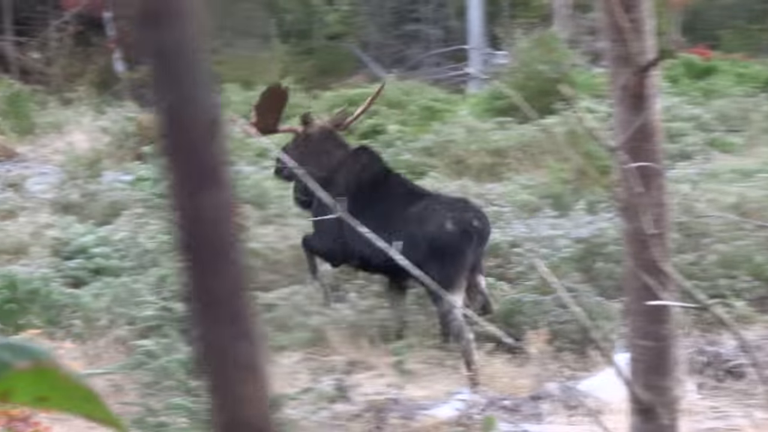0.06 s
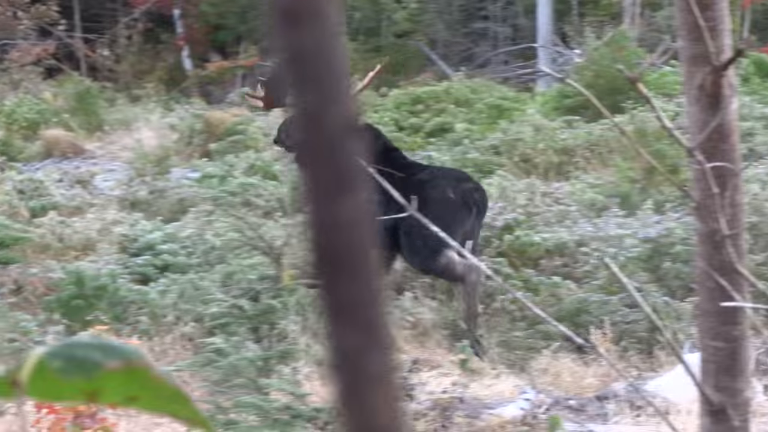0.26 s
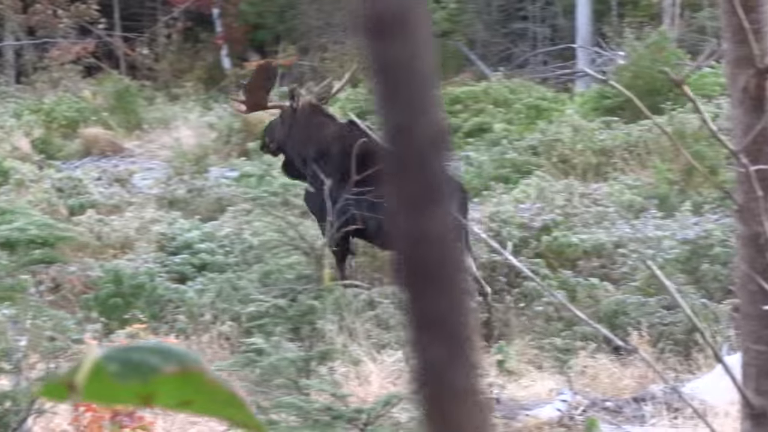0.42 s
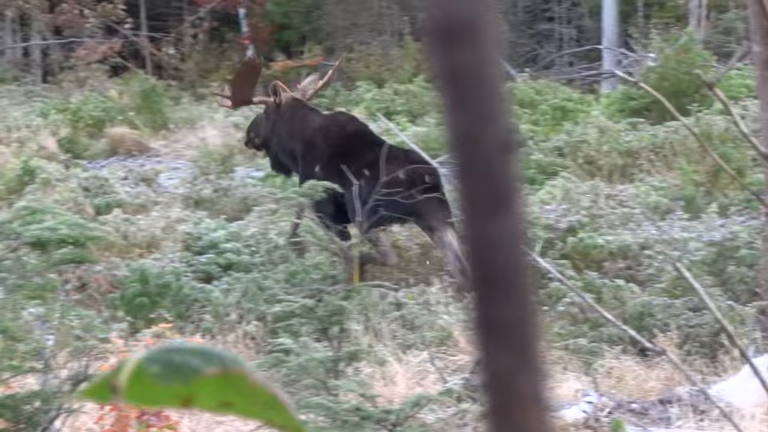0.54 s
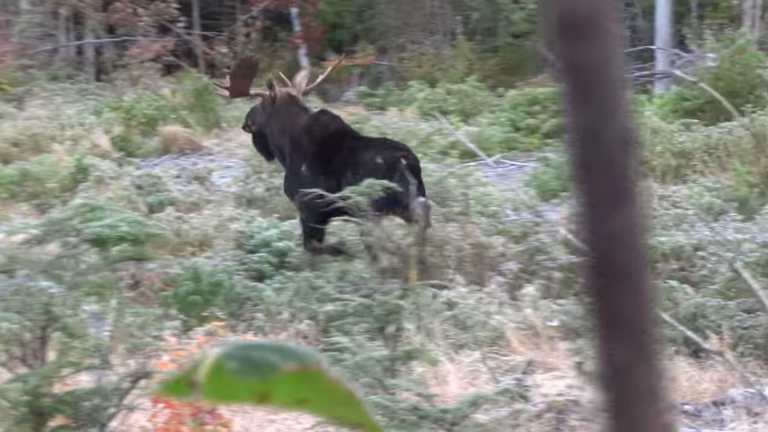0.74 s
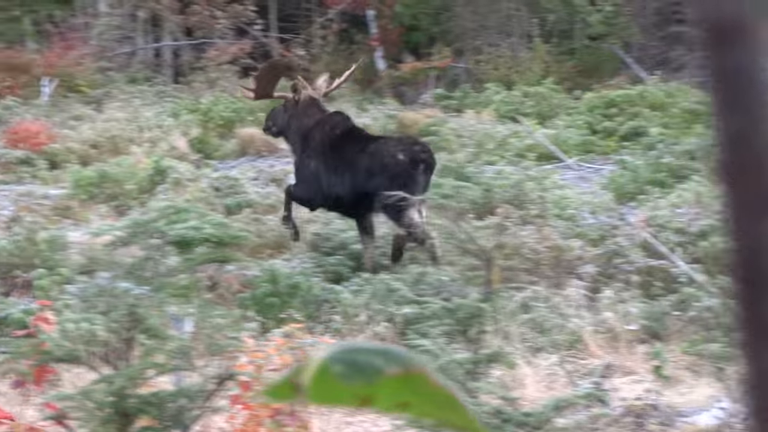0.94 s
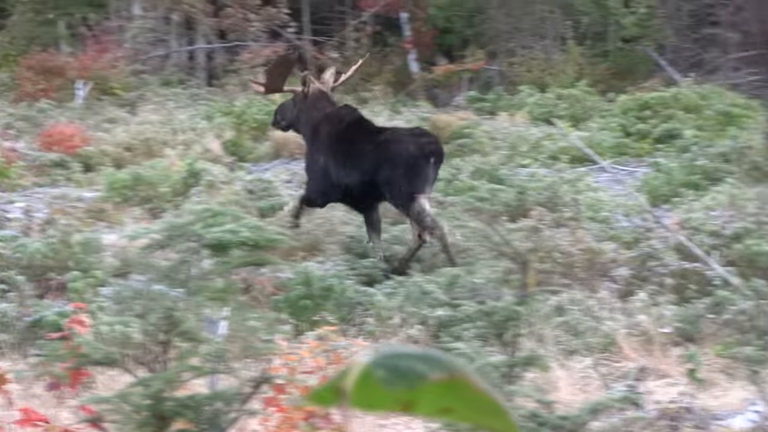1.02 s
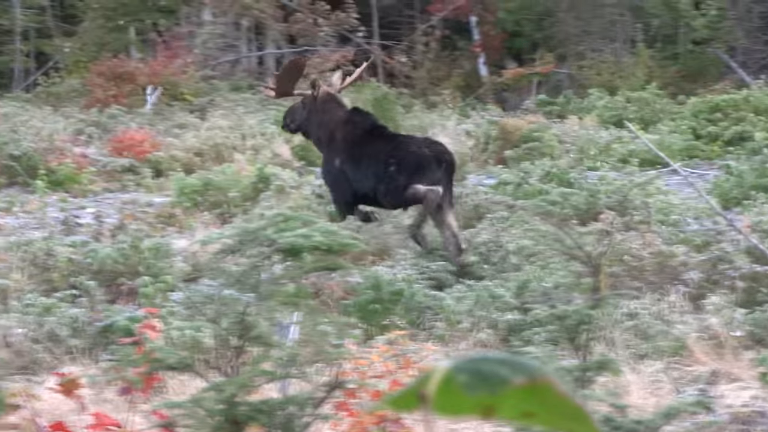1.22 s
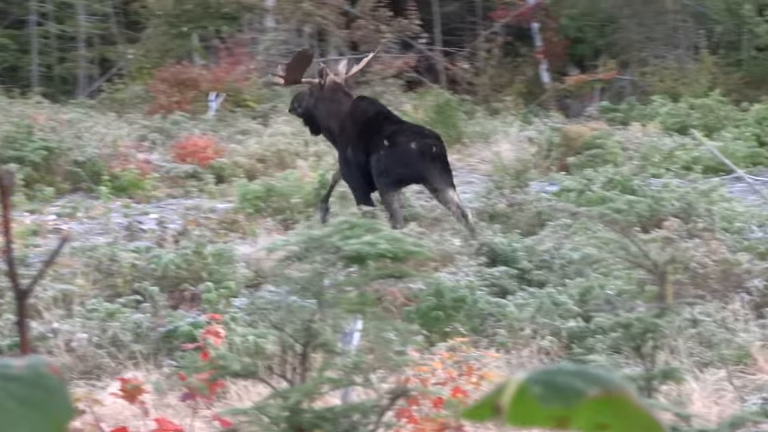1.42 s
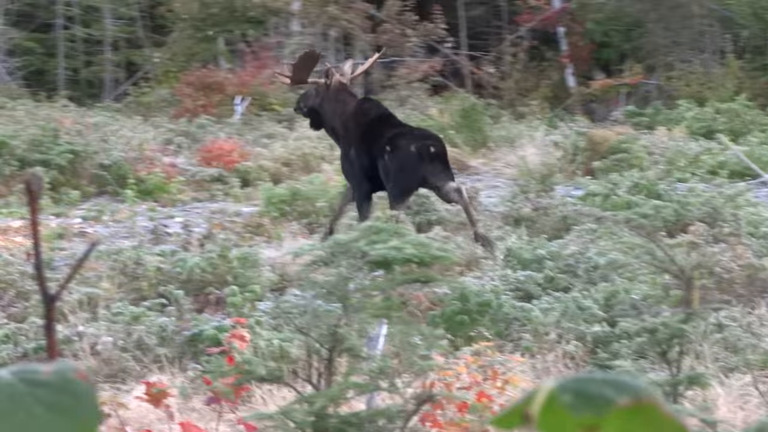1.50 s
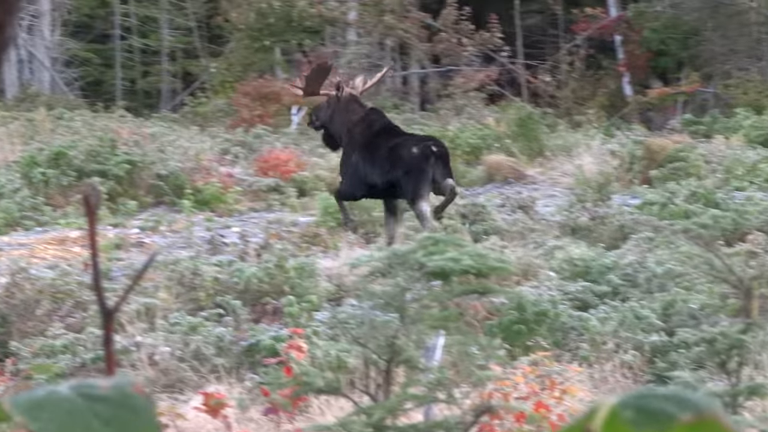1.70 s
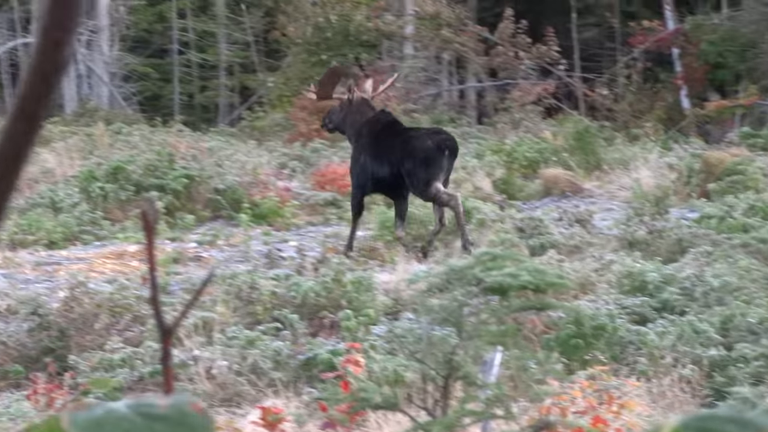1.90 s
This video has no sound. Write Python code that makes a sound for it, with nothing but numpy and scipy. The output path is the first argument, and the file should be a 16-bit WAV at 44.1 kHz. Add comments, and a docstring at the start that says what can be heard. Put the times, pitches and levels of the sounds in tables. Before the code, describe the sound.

Close, crackling rustle of leaves and stems, with sharp twig snaps under a trotting moose.

```python
"""A close, dry rustle swells unevenly in a forest clearing while a moose trots through it.
Leaves hiss and stems crackle: countless tiny contacts over a smooth rubbing noise.
Twigs crack and ring as their fibres tear, two of them sharply, and thicker sticks knock.
Underneath lie faint low thumps and light wind on the foliage and the microphone.
The trees return a short echo of the breaking wood."""
import sys
import numpy as np
from scipy import signal
from scipy.fft import rfft, irfft, next_fast_len
from scipy.io import wavfile
from scipy.ndimage import map_coordinates

SR = 44100
rng = np.random.default_rng(int(sys.argv[2]) if len(sys.argv) > 2 else 0)


def int16_out(signal):
    """Quantize to a 16-bit WAV file."""
    q = np.round(np.clip(np.atleast_2d(signal).T, -1, 1) * 32767)
    wavfile.write(sys.argv[1], SR, q.astype(np.int16))


N = 85995


def amp(db):
    """Decibels to gain."""
    return 10 ** (np.asarray(db) / 20)


def unit(x):
    """Scale to an rms of 1."""
    return x / np.sqrt(np.mean(x ** 2) + 1e-20)


def curve_at(points, hz):
    """Read (frequency, value) breakpoints on a log frequency axis."""
    freqs, values = np.transpose(points)
    return np.interp(np.log(hz + 1), np.log(freqs + 1), values)


def wobble(per_s):
    """A smooth random modulator with per_s knots a second."""
    knots = rng.standard_normal(int(N * per_s / SR) + 4)
    return map_coordinates(knots, [np.arange(N) * per_s / SR])


def filtered(x, response):
    """Apply a gain given as a function of frequency."""
    size = next_fast_len(x.shape[-1] + 8192)
    hz = np.fft.rfftfreq(size, 1 / SR)
    return irfft(rfft(x, size) * response(hz), size)[..., :x.shape[-1]]


def coloured(x, spectrum):
    """Apply an EQ curve, normalised to unit power."""
    return filtered(x, lambda hz: unit(amp(curve_at(spectrum, hz))))


def wood_low_cut(x, cut_hz=890):
    """Roll off the lows: thin wood radiates no bass."""
    return signal.sosfilt(signal.butter(2, cut_hz, "high", fs=SR, output="sos"), x)


def add(track, start_s, sound):
    """Mix a sound into the track at start_s."""
    part = track[..., max(0, round(start_s * SR)):][..., :sound.shape[-1]]
    part += sound[..., :part.shape[-1]]


# Stereo image, 1 being mono (frequency [Hz], left-right correlation [0-1])
STEREO_IMAGE = [(60, 0.9), (250, 0.9), (500, 0.76), (1000, 0.71), (2000, 0.83), (4000, 0.93), (8000, 0.99),
                (11000, 0.8)]

def stereo(pair):
    """Blend two unrelated signals as mid and side, with a width that depends on frequency."""
    def mid_side_gains(hz):
        angle = np.arccos(np.clip(curve_at(STEREO_IMAGE, hz), -1, 1)) / 2
        return np.array([np.cos(angle), np.sin(angle)])
    mid, side = filtered(pair, mid_side_gains)
    return np.array([mid + side, mid - side])


# Tone of the wind bed (frequency [Hz], level [dB])
WIND_EQ = [(20, -41), (35, -27), (60, -12.5), (90, -17.5), (180, -18), (300, -11.5), (500, -4.5),
           (750, -2.5), (1020, 3.5), (1400, -9.5), (2000, -7), (4000, -12), (11000, -24)]

def wind(level_db, gust_db):
    """Light air on foliage and microphone: a faint, barely wavering rush."""
    rush = unit(coloured(rng.standard_normal((2, N)), WIND_EQ))
    return amp(level_db + gust_db * wobble(per_s=6.3)) * stereo(rush)


# Reverb decay among the trees (frequency [Hz], t60 [s])
FOREST_DECAY = [(300, 0.24), (2000, 0.49), (10000, 0.13)]

def forest_echo(x):
    """Trees scatter sound into a short, diffuse tail; the treble dies first."""
    hz, t, noise = signal.stft(rng.standard_normal((2, SR // 2)), SR, nperseg=256)
    decay = amp(-60 * t / curve_at(FOREST_DECAY, hz)[:, None])
    _, tail = signal.istft(noise * decay, SR, nperseg=256)
    tail /= np.linalg.norm(tail[0])
    return stereo(signal.fftconvolve(x.mean(0)[None], tail, axes=1)[:, :N])


# Low thump cues (time [s], level [dB], pitch [Hz])
THUMP_CUES = [(.305, -75, 135), (.38, -80, 55), (.837, -72, 101), (1.225, -83, 50.4)]

def thumps(attack_s=0.008, t60=0.11):
    """Faint low bumps, each a damped sine with a soft attack."""
    out, t = np.zeros(N), np.arange(SR // 4) / SR
    envelope = (1 - np.exp(-t / attack_s)) * amp(-60 * t / t60)
    for start_s, db, hz in THUMP_CUES:
        add(out, start_s, amp(db) * envelope * np.sin(2 * np.pi * hz * t))
    return out


# Thick sticks giving way (time [s], level [dB], pitch [Hz])
KNOCK_CUES = [(0.376, -33, 2630), (0.4239, -39.5, 2200), (0.557, -47, 2070), (0.6148, -36.5, 2100),
              (.6755, -42, 2300), (0.751, -33.5, 1820), (0.766, -38.5, 1960), (1.195, -31.5, 2210),
              (1.2352, -27.5, 1380), (1.253, -33, 2340), (1.255, -36, 1110), (1.669, -42.5, 726)]
# Ringing modes of a stick (frequency / pitch [ratio], level [dB], t60 [s])
STICK_MODES = [(.76, -1.5, 0.0032), (1, 0.5, 0.0074), (1.3, -1, 0.0056), (1.7, -5.5, .004)]

def stick_knocks(scatter_db=-11, scatter_t60=0.033):
    """Thick sticks give a short, hollow ring that scatters in the brush."""
    out, t = np.zeros(N), np.arange(SR // 12) / SR
    scatter_envelope = amp(scatter_db - 60 * t / scatter_t60)
    for start_s, db, hz in KNOCK_CUES:
        ring = sum((-1) ** k * amp(mode_db - 60 * t / t60) * np.sin(2 * np.pi * hz * ratio * t)
                   for k, (ratio, mode_db, t60) in enumerate(STICK_MODES))
        scatter = unit(signal.fftconvolve(rng.standard_normal(len(t)), ring)[:len(t)])
        add(out, start_s, amp(db) * (ring + scatter_envelope * scatter))
    return wood_low_cut(out)


# Woody resonances of a twig (frequency [Hz], bandwidth [Hz], level [dB])
TWIG_MODES = [(1080, 53, -12.5), (2100, 260, 1), (3180, 350, 7), (4370, 300, 10.5), (5440, 320, 7.5)]

def twig_body(hz):
    """A twig's normalised frequency response: resonances of alternating polarity."""
    response = sum((-1) ** k * amp(db) * 1j * hz * width / (centre ** 2 - hz ** 2 + 1j * hz * width)
                   for k, (centre, width, db) in enumerate(TWIG_MODES))
    return response / np.std(response)


# Twigs breaking (time [s], level [dB], crack t60 [s], woody ring relative to crack [dB])
SNAP_CUES = [(0.0214, -39, 0.019, -5), (0.1058, -40.5, .012, -5), (.1970, -30, 0.0097, -16),
             (0.3922, -19.5, 0.015, -2.5), (0.4559, -17, 0.014, -1.5), (0.463, -26.5, .025, -12),
             (0.6134, -36.5, 0.028, -17), (0.7276, -34.5, 0.062, 1), (0.856, -40, 0.045, -24),
             (.900, -43, 0.069, -18), (1.0565, -34, 0.013, -11), (1.1999, -42, 0.017, 8),
             (1.2238, -33, 0.006, -2.5), (1.265, -37.5, 0.021, 2.5), (1.3774, -35.5, 0.032, -18)]
# Bright tone of tearing fibres (frequency [Hz], level [dB])
TEAR_EQ = [(1000, -49), (2500, -20.5), (4000, -18), (5400, -9.5), (6600, 3.5), (7600, -0.5), (9200, -3),
           (10200, -11.5), (11000, -16)]

def twig_snaps(attack_s=0.00055, tail_db=-14, tail_t60=0.15, click_db=14.5, splinter_db=-3.5):
    """The break rings the twig while its fibres tear; nearby brush scatters a tail."""
    out, t = np.zeros((2, N)), np.arange(SR // 5) / SR
    attack = 1 - np.exp(-t / attack_s)
    tail = amp(tail_db - 60 * t / tail_t60)
    for start_s, db, t60, woody_db in SNAP_CUES:
        envelope = attack * (amp(-60 * t / t60) + tail)
        tear, splinters = envelope * rng.choice([-1, 1], (2, 2, len(t)))
        # One click starts the ring; the splintering keeps it going.
        drive = amp(click_db) * (t == 0) + amp(splinter_db) * splinters
        ring = amp(woody_db) * filtered(drive, twig_body)
        add(out, start_s, amp(db) * (coloured(tear, TEAR_EQ) + ring))
    return wood_low_cut(stereo(out))


def crackle(spectrum, ticks_per_s, spread_db, hiss_gain):
    """Tiny contacts tick at random over a smooth rubbing hiss."""
    sizes = amp(spread_db * np.clip(rng.standard_normal(N), -2.5, 2.5))
    contacts = rng.random(N) < ticks_per_s / SR
    ticks = unit(contacts * sizes * rng.choice([-1, 1], (2, N)))
    hiss = hiss_gain * rng.standard_normal((2, N))
    return stereo(unit(coloured(ticks + hiss, spectrum)))


# Swells of the rustle (time [s], leaf level [dB], stem level [dB])
BRUSH_SWELLS = [(0, -49, -59.5), (0.062, -56.5, -66), (0.093, -44.5, -62.5), (0.18, -52.5, -64.5),
                (0.225, -42, -54), (0.26, -41.5, -55.5), (0.306, -45, -52.5), (0.345, -43, -55),
                (0.385, -45, -42.5), (0.44, -43, -57), (0.5, -42.5, -49.5), (0.584, -49, -51),
                (0.634, -41, -52), (0.659, -46, -51.5), (0.689, -40.5, -44.5), (0.737, -41.5, -43.5),
                (0.79, -45, -50), (0.835, -49, -49), (0.864, -44, -51.5), (0.93, -56.5, -57),
                (1.005, -49.5, -59.5), (1.071, -42.5, -48), (1.15, -44, -50.5), (1.204, -38.5, -44),
                (1.267, -44.5, -43.5), (1.3, -48.5, -54), (1.36, -51, -51), (1.385, -47, -61),
                (1.42, -47, -54), (1.5, -45, -55.5), (1.6, -43, -51.5), (1.66, -48, -56.5),
                (1.71, -53, -61), (1.802, -57.5, -69.5), (1.94, -58.5, -69.5)]
# Airy top of the leaves (frequency [Hz], level [dB])
LEAF_EQ = [(100, -71), (1500, -48), (3000, -12.5), (4500, -8), (5500, -6), (6400, -1), (6850, -3.5),
           (7350, 3), (8000, -0.5), (9000, -4.5), (10000, -9), (11000, -16.5)]
# Midrange crunch of the stems (frequency [Hz], level [dB])
STEM_EQ = [(30, -56), (100, -44), (250, -31.5), (700, -21.5), (1050, -6.5), (1450, -16), (1700, -9.5),
           (1950, -1), (2600, -4.5), (3350, -6), (3850, -0.5), (4350, -0.5), (5200, -2.5), (7000, -6.5),
           (11000, -21)]

def brush_rustle(leaf_trim_db, stem_trim_db, flutter_db):
    """Close, dry rustle: leaves and stems rub, swell and flutter together."""
    t = np.arange(N) / SR
    times, leaf_db, stem_db = np.transpose(BRUSH_SWELLS)
    leaves = crackle(LEAF_EQ, ticks_per_s=5000, spread_db=0, hiss_gain=0.72)
    leaves *= amp(np.interp(t, times, leaf_db) + leaf_trim_db)
    stems = crackle(STEM_EQ, ticks_per_s=600, spread_db=2, hiss_gain=0.76)
    stems *= amp(np.interp(t, times, stem_db) + stem_trim_db)
    return (leaves + stems) * amp(flutter_db * wobble(per_s=130))


def scene():
    """Rustle and breaking wood over the wind bed; only the wood feeds the echo."""
    wood = twig_snaps() + stick_knocks()
    rustle = brush_rustle(leaf_trim_db=0.5, stem_trim_db=-1, flutter_db=0.88)
    echo = amp(-10.5) * forest_echo(wood)
    return rustle + wood + echo + thumps() + wind(level_db=-72, gust_db=0.2)


def record(dry):
    """A steep high cut on the whole mix."""
    top_hz = 11050
    return filtered(dry, lambda hz: amp(-np.clip((hz - top_hz) / 10, 0, 120)))


dry = scene()
out = record(dry)
int16_out(out)
```